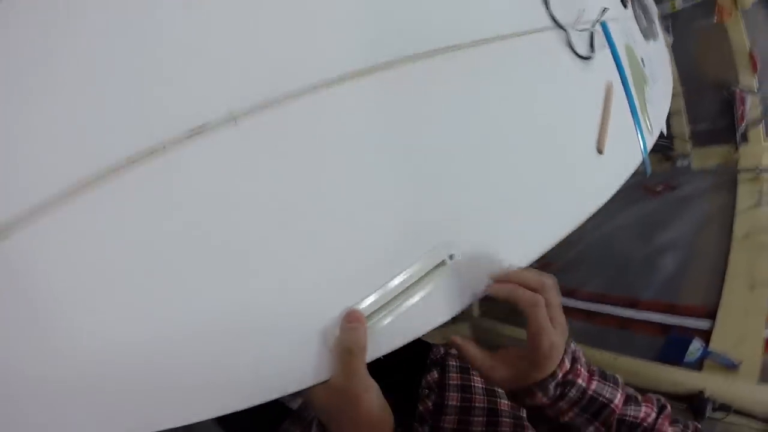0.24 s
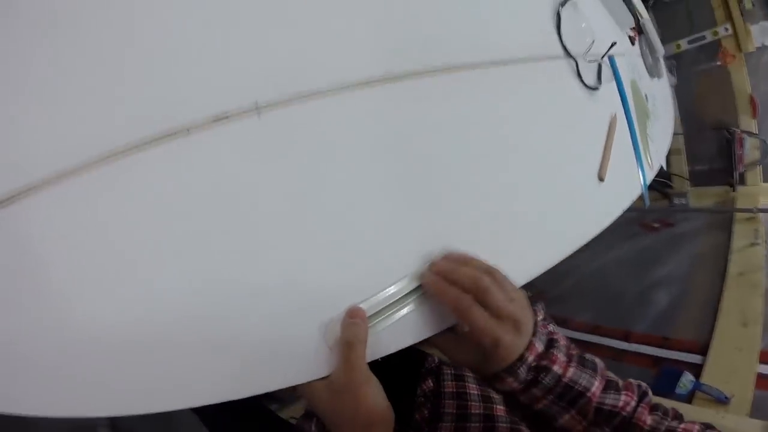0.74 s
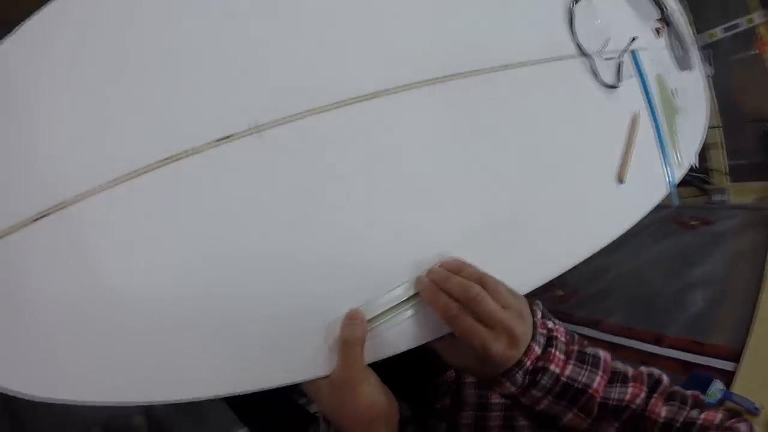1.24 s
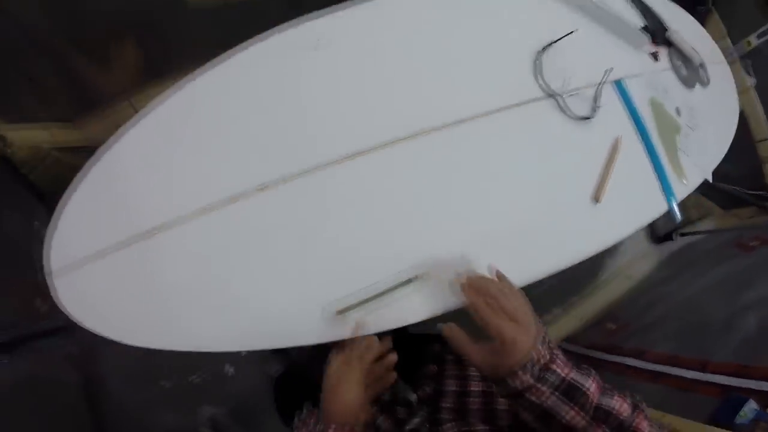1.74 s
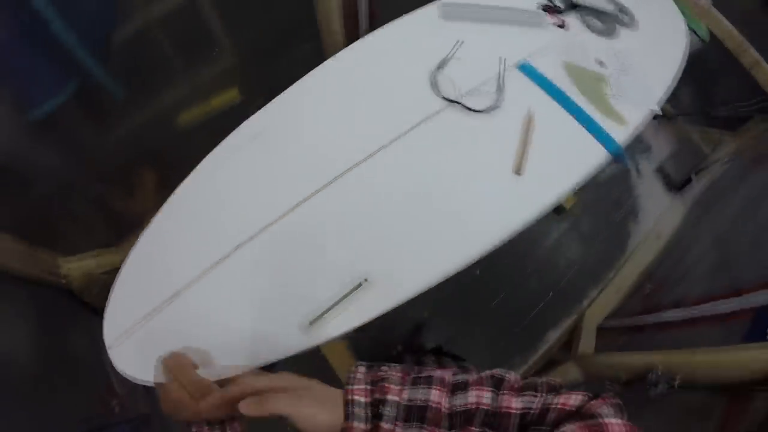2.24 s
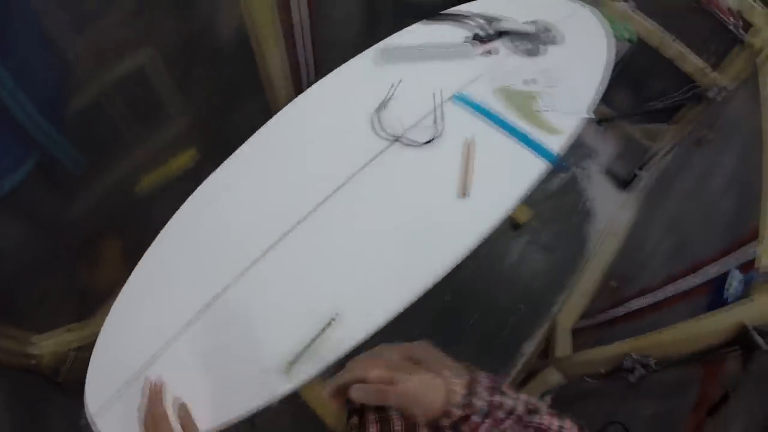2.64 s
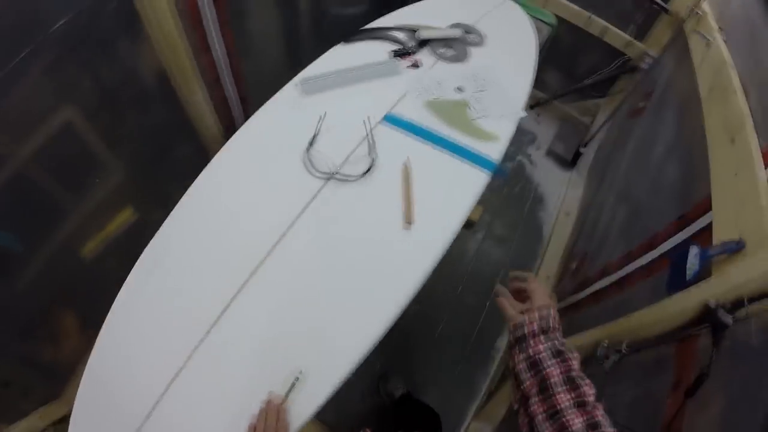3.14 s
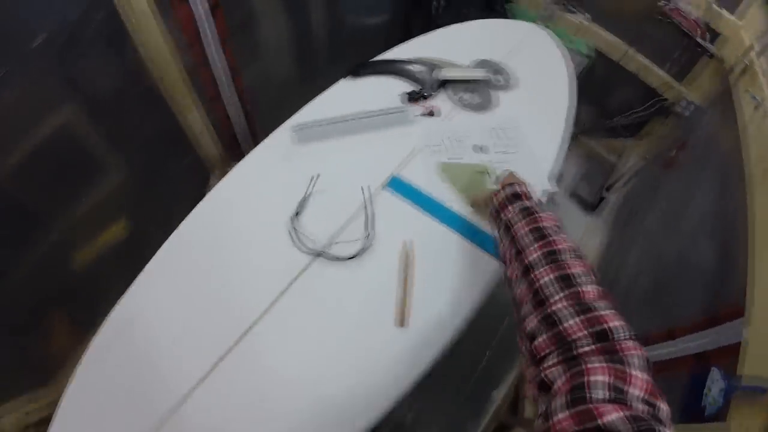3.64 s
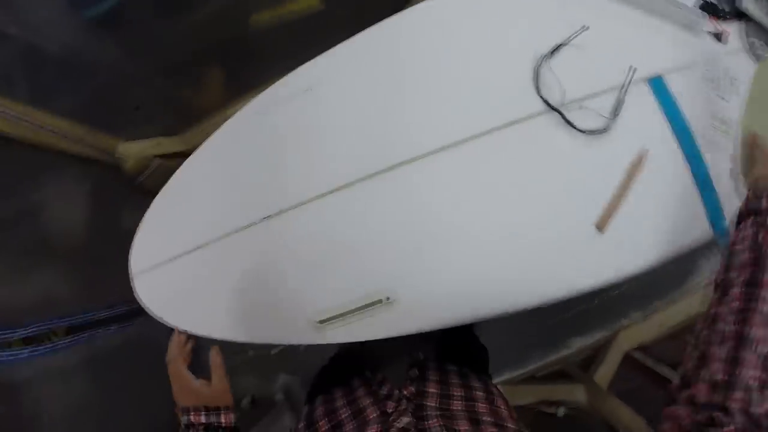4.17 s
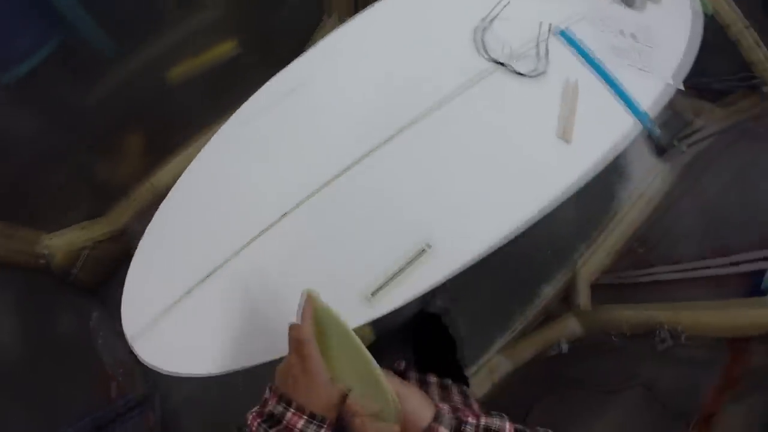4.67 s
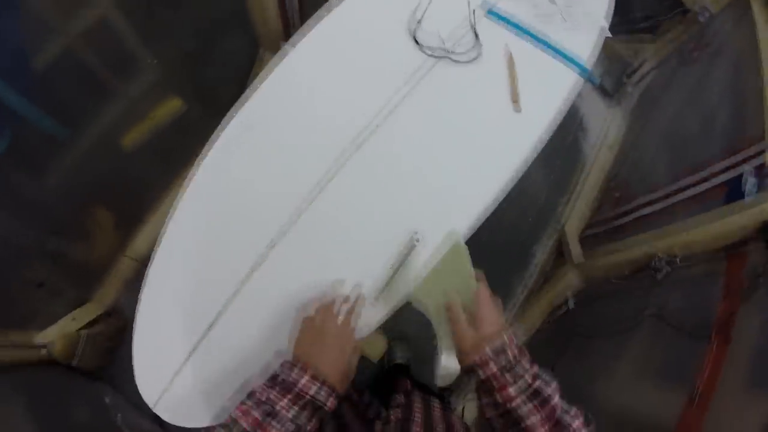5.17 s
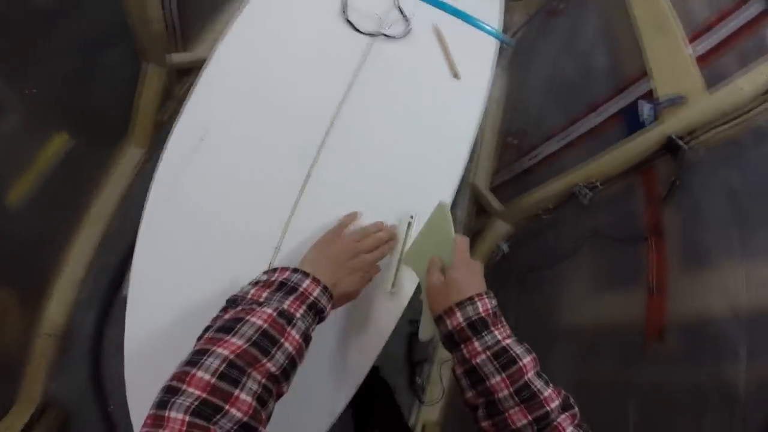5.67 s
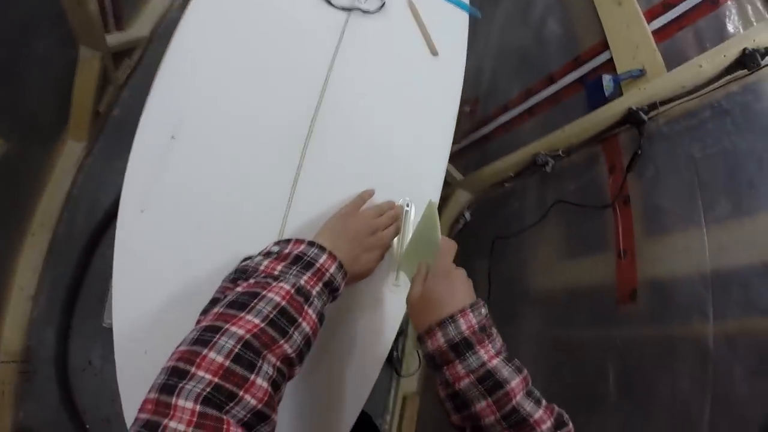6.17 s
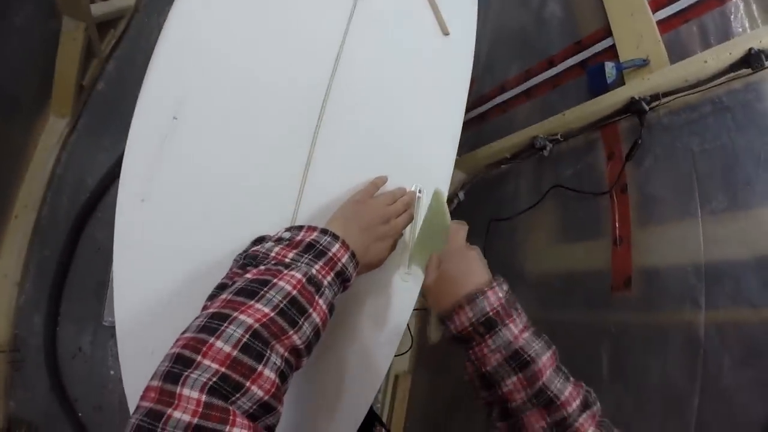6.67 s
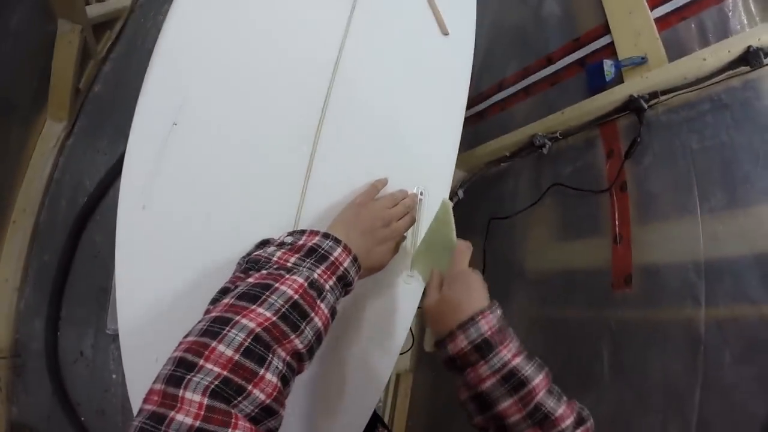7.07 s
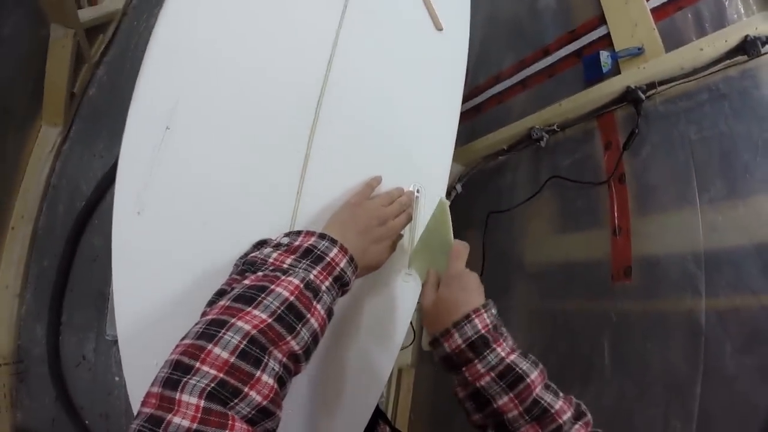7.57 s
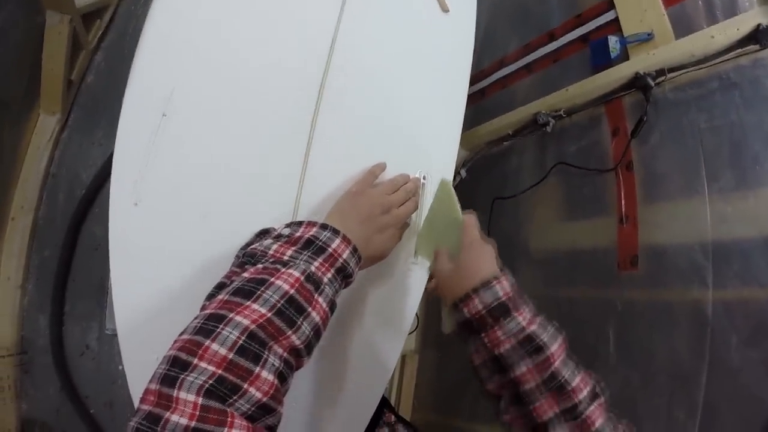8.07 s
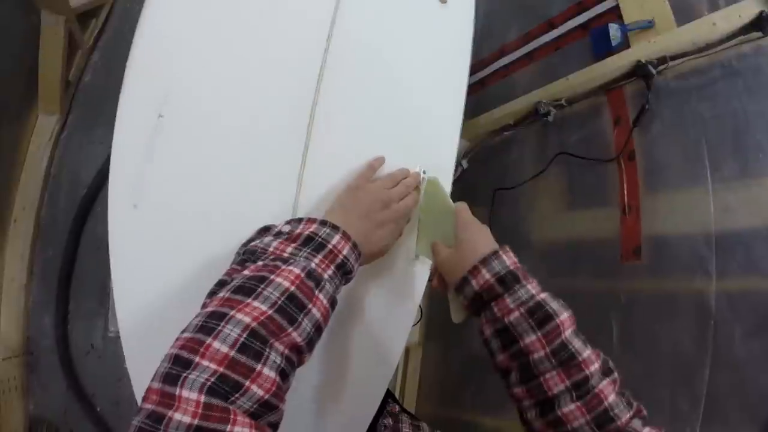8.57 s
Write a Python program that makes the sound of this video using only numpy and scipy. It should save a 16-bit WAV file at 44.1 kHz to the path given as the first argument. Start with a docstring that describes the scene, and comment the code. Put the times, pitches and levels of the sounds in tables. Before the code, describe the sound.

A small body-worn microphone near the hands catches dry tape-like ticks and rubbing on foam, airy palm swishes with brief gliding squeaky breaths of noise, and soft thuds of the board on its padded stand. After a sharp knock comes sparse, faint rubbing, then stronger stick-slip scraping and two loud plastic cracks. Quiet bassy room noise, short dull echoes.

```python
"""Fitting a fin to a foam blank

Hands work at a fin box set into a foam surfboard blank on a padded stand in a workshop. A tape is peeled, palms
and sleeves brush and hands rub together (dense grains), the blank is shifted with dull bumps, then a plastic fin
is knocked and pushed into the slot (stick-slip). Every tick, bump and knock is a pulse with briefly ringing modes
of the light blank and its stand; one tick may be a lip smack.
An air pocket adds gliding resonant noise; short echoes and a quiet noise hum make the room."""
import sys
import numpy as np
from scipy import signal
from scipy.fft import rfft, irfft, next_fast_len
from scipy.io import wavfile

SR = 44100
rng = np.random.default_rng(int(sys.argv[2]) if len(sys.argv) > 2 else 0)


def wrap_up_sound(samples):
    """Save the sound to the file named by the first command line argument, as 16-bit audio."""
    columns = np.atleast_2d(samples).T
    # keep every value between -1 and 1, then stretch to whole-number steps
    tamed = np.clip(columns, -1, 1)
    steps = np.round(tamed * 32767).astype(np.int16)
    wavfile.write(sys.argv[1], SR, steps)


def how_loud(loudness_db):
    """Turn decibels into a plain amplitude multiplier (0 dB gives 1, 20 dB gives 10)."""
    steps = np.asarray(loudness_db, float) / 20
    return 10 ** steps


N = 388521


def rms_one(x):
    """Scales to rms 1."""
    return x / np.sqrt(np.mean(x ** 2) + 1e-20)


def drift(rate_hz):
    """Slow random wander of rms about 1: noise through two equal low-pass poles."""
    hop = 40
    r = np.exp(-2 * np.pi * rate_hz * hop / SR)
    noise = rng.standard_normal(N // hop + 2002)
    slow = signal.lfilter([1], [1, -2 * r, r * r], noise)[2000:]   # drop the filter's start-up
    return np.interp(np.arange(N) / hop, np.arange(len(slow)), rms_one(slow))


def ring(drive, hz, t60_s):
    """One damped mode: a unit click sets a sine ringing from height 1."""
    r = how_loud(-60 / (t60_s * SR))
    w = 2 * np.pi * hz / SR
    return signal.lfilter([0, np.sin(w)], [1, -2 * r * np.cos(w), r * r], drive + 1e-18)


def coloured(x, spectrum):
    """Shapes white input to a spectrum (frequency [Hz], density [dB per Hz]); unit gain on white noise."""
    hz, db = np.transpose(spectrum)
    size = next_fast_len(len(x))
    bin_hz = np.arange(size // 2 + 1) * SR / size
    gain = rms_one(how_loud(np.interp(np.log(bin_hz + 1), np.log(hz), db)))
    return irfft(rfft(x, size) * gain, size)[:len(x)]


def grains(per_s, spread_db):
    """Random slips of uneven size; rms about 1 at a steady rate."""
    sizes = how_loud(spread_db * np.minimum(rng.exponential(1, N), 4)) * rng.choice([-1, 1], N)
    born = rng.random(N) < per_s / SR
    return sizes * born / np.sqrt(np.mean(sizes ** 2) * per_s / SR)


def touch(push_ms):
    """Pressure of one contact: a raised-cosine push and a longer, weaker rebound."""
    count = max(int(push_ms * SR / 1000), 4)
    rebound = -.55 * np.hanning(int(1.35 * count) + 2)
    return np.concatenate([np.hanning(count + 2), rebound])


def add(out, s, x):
    """Mixes x into out at s seconds."""
    at = int(s * SR)
    out[at:at + len(x)] += x[:N - at]


def in_time(spans):
    """Joins curve rows by straight lines, one value a sample."""
    s, *columns = np.transpose(np.concatenate(spans))
    return [np.interp(np.arange(N) / SR, s, c) for c in columns]


def strokes(peak_s, rise_s, fall_s, level_db, rest_db):
    """Strokes swell to a peak and die away; their powers add over a resting level; dB per sample."""
    fade_db = 20   # change over one rise or one fall
    t = np.arange(0, N + 64, 64)[:, None] / SR
    before = (peak_s - t) / np.maximum(rise_s, .004)
    after = (t - peak_s) / np.maximum(fall_s, .004)
    shape_db = level_db - fade_db * np.maximum(before, after)
    total_db = 10 * np.log10(np.sum(how_loud(2 * shape_db), axis=1) + how_loud(2 * rest_db))
    return np.interp(np.arange(N) / SR, t[:, 0], total_db)


# Room noise spectrum: (frequency [Hz], density [dB per Hz])
ROOM_TONE_SPECTRUM = [(12, -24), (20, 13.5), (81, -1), (643, -17.5), (2470, -27), (4700, -30), (11100, -38),
                      (12400, -50), (16100, -89), (22000, -120)]
ROOM_DB = -53.5


def room_tone():
    """Room hum: bass-heavy noise whose level wanders slowly."""
    level_db = ROOM_DB + 1.0 * drift(0.75)
    return how_loud(level_db) * coloured(rng.standard_normal(N), ROOM_TONE_SPECTRUM)


# Nominal modes of the padded stand: (frequency [Hz], level [dB], t60 [s])
STAND_MODES = [(66.1, -9, 0.44), (83.2, -6, 0.16), (118.2, -1.5, 0.13), (231, -22, 0.11)]
# Weight on the stand: (time [s], level [dB])
LEAN_CURVE = [(0.0, -54.5), (1.13, -67), (1.3, -67), (1.96, -60), (2.53, -56.5), (2.89, -62), (3.12, -57),
              (4.24, -55.5), (4.49, -79), (4.61, -49.5), (4.81, -60), (5.4, -57), (5.72, -36.5),
              (5.86, -73), (5.96, -34.5), (6.13, -53.5), (7.0, -60), (7.75, -59), (8.34, -64), (8.46, -50),
              (8.71, -48), (8.81, -36)]


def lean(level_db):
    """Weight shifts: unsteady noise keeps the low modes of the stand murmuring."""
    shake = rng.standard_normal(N) * how_loud(3.6 * drift(8.1))
    # half the level spread in dB, quicker decay
    murmur = sum(how_loud(m * .5) * ring(shake, hz, t60_s * 0.34) for hz, m, t60_s in STAND_MODES)
    return how_loud(level_db) * rms_one(murmur)


# Nominal modes of the foam blank: (frequency [Hz], level [dB], t60 [s])
BLANK_MODES = [(177, -11.5, 0.053), (205, -13.5, 0.086), (279, -7.5, 0.048), (351, -6.5, 0.031),
               (423, -9.5, 0.037), (440, -5, 0.022), (546, -12, 0.07), (599, -17.5, 0.073), (701, -8, 0.04),
               (758, -22.5, 0.051), (833, -6.5, 0.025), (896, 4.5, 0.013), (1063, -12, 0.074),
               (1273, -8.5, 0.028), (1416, -2, 0.015), (1442, -7, 0.036), (1690, -11.5, 0.045),
               (1900, -19, 0.035), (2100, -16, 0.037), (2260, -12, 0.12), (2460, -5, .04), (2750, -36, .03),
               (3380, 1, .03)]
# Fine grit on foam: (frequency [Hz], density [dB per Hz])
SCRAPE_SPECTRUM = [(240, -48.5), (400, -15), (631, 0), (682, -2), (1060, 0), (1790, -2), (3220, -6.5),
                   (9000, -25.5), (11700, -59), (19800, -120)]
# Fingers, tape and fin dragged on foam, one row a stroke:
# (peak time [s], rise [s], fall [s], scrape level [dB], shake of the blank re scrape [dB])
DRAG_STROKES = [(0.09, 0.87, 0.77, -54, -10), (0.338, 0.1, 0.029, -43.5, -2.5), (0.55, .4, 0.13, -59, -0.5),
                (0.84, 0.11, 0.44, -60, -12), (1.02, 0.66, 0.059, -46.5, -8.5),
                (1.12, 0.046, .22, -45.5, -9), (1.255, 0.32, 0.053, -40, -3.5),
                (1.334, 0.13, 0.083, -42.5, -7), (1.53, 0.046, 0.27, -46.5, -3),
                (1.628, 0.15, 0.13, -39.5, -8.5), (1.732, 0.15, 0.058, -33, -9.5),
                (2.0, 0.36, 0.45, -61.5, -2.5), (2.344, .2, .2, -63, -13), (2.65, 0.46, .15, -61, -3),
                (2.95, 0.4, 0.61, -55.5, -5.5), (3.052, 0.056, 0.071, -48, -3),
                (3.138, 0.059, 0.071, -46, -5.5), (3.29, 0.18, .12, -49.5, -20),
                (3.57, 0.68, 0.15, -49, -12), (3.876, 0.077, 0.32, -52.5, -1.5),
                (4.118, .06, .1, -49.5, -3.5), (4.39, .08, 0.13, -89, -14), (4.58, .15, 0.59, -55.5, -0.5),
                (4.83, 1, 0.43, -53, -12.5), (5.2, 0.38, 1, -56.5, -3.5), (5.63, 0.17, 0.59, -55.5, 0),
                (5.83, 0.059, 0.099, -47.5, 1), (5.924, 0.1, 0.072, -40, 2.5),
                (6.04, 0.33, 0.35, -47.5, 0.5), (6.372, 0.37, 0.051, -51.5, 0),
                (6.588, 0.14, 0.08, -49, -4), (6.71, 0.22, 0.9, -59, -1), (7.14, 0.2, 0.19, -58.5, -8),
                (7.228, 0.011, .03, -48, -8), (7.268, 0.0092, 0.056, -47.5, -2),
                (7.45, 0.03, 0.047, -42.5, -1), (7.52, 0.3, 0.55, -59.5, -1.5),
                (7.715, .03, 0.11, -54.5, 3.5), (7.877, .02, 0.24, -50.5, 0.5),
                (7.993, .06, 0.13, -48.5, 4), (8.11, 0.19, 0.3, -45.5, -6),
                (8.371, 0.078, 0.089, -33.5, 7.5), (8.46, 0.13, 0.23, -42.5, -3),
                (8.576, .2, 0.1, -44.5, 2), (8.652, .03, 0.12, -47, -8), (8.74, 0.07, 0.25, -43, 7),
                (8.81, 0.17, .1, -49, 7)]
DRAG_REST_DB = -66   # the hands never rest quite


def scrape():
    """Stick and slip: clumped slips over fine grit; each stroke also shakes the blank's low modes by its own amount."""
    *when, drag_db, deep_db = np.transpose(DRAG_STROKES)
    level_db = strokes(*when, drag_db, DRAG_REST_DB)
    shake_db = strokes(*when, drag_db + deep_db, DRAG_REST_DB) - level_db
    slips = np.convolve(grains(110 * how_loud(5.0 * drift(15)), 2.75), touch(0.34))[:N]
    # shorter t60 than after a knock
    high = sum(how_loud(m) * ring(slips, hz, t60_s * 0.73) for hz, m, t60_s in BLANK_MODES if hz > 750)
    slips = rms_one(slips + how_loud(7) * high)
    grit = grains(8000, 2.2)
    body = sum(how_loud(m) * ring(grit, hz, t60_s * .5) for hz, m, t60_s in BLANK_MODES if 190 < hz < 750)
    rubbing = 0.4 * slips + 0.73 * coloured(grit, SCRAPE_SPECTRUM)
    return how_loud(level_db) * (rubbing + how_loud(shake_db) * rms_one(body))


# Skin and cloth rubbing: sleeves and palms on foam, and hands rubbed together:
# (frequency [Hz], density [dB per Hz])
BRUSH_SPECTRUM = [(1470, -17), (2500, -16), (2860, -1), (5120, 3), (7860, -1.5), (11400, -6), (12400, -20),
                  (16100, -30), (22000, -120)]
# Palms, sleeves and rubbed hands, one row a stroke: (peak time [s], rise [s], fall [s], level [dB])
SWISH_STROKES = [(0.01, 0.062, 0.37, -58.5), (0.32, 0.11, 0.12, -53.5), (0.56, 0.38, .15, -66),
                 (0.78, .1, .5, -61), (0.932, 0.055, 0.22, -51.5), (1.078, 0.016, .2, -55),
                 (1.196, .03, 0.049, -49), (1.243, 0.025, .08, -47), (1.375, .4, .045, -57),
                 (1.525, .035, 0.21, -55.5), (1.63, 0.17, .3, -53.5), (1.72, 0.16, 0.068, -51.5),
                 (2.104, .03, 0.09, -68), (2.168, 0.0091, 0.024, -61), (2.27, 0.098, 0.17, -45),
                 (2.335, 0.13, .06, -43.5), (2.612, 0.065, 0.066, -39), (2.665, .08, 0.037, -58),
                 (3.047, 0.062, 0.095, -61), (3.154, 0.13, 0.2, -54.5), (3.28, .15, 0.055, -59),
                 (3.592, 0.38, 0.072, -50), (3.896, 0.15, 0.098, -56), (3.97, .03, 0.059, -57),
                 (4.11, 0.037, 0.12, -55), (4.155, 0.081, 0.044, -50), (4.385, 0.036, .2, -56),
                 (4.46, 0.24, 0.079, -56), (4.72, 0.1, 0.49, -58.5), (4.88, 0.55, .17, -64.5),
                 (5.04, 0.038, 0.54, -61), (5.55, 0.034, .5, -76), (5.672, .05, .1, -63),
                 (5.81, 0.075, .6, -58), (5.97, 0.55, .15, -60.5), (6.208, 0.28, 0.13, -58),
                 (6.585, .06, .12, -70), (7.23, .02, .07, -68), (7.27, .04, 0.099, -66),
                 (7.44, .01, 0.15, -58), (7.475, 0.09, .04, -61), (7.55, .1, 0.28, -76),
                 (7.996, 0.19, 0.19, -60.5), (8.156, 0.13, .07, -59), (8.28, .01, .03, -64),
                 (8.368, 0.083, 0.18, -62), (8.43, .03, 0.076, -56), (8.695, 0.066, 0.038, -53),
                 (8.81, 0.43, 0.12, -60)]
SWISH_REST_DB = -83


def brush():
    """Palms, sleeves and hands rubbed together: very dense fine grains, bright and flickering."""
    level_db = strokes(*np.transpose(SWISH_STROKES), SWISH_REST_DB)
    return how_loud(level_db + 1.72 * drift(20)) * coloured(grains(12000, 1.5), BRUSH_SPECTRUM)


# Hands and hips bump the blank on its stand: (time [s], pulse peak [dB], push time [ms],
# ring of the blank re pulse [dB], bump of the stand re pulse [dB])
BUMP_HITS = [(0.2701, -41, 0.92, -4, -8), (0.7675, -39.5, 1.2, -13, 2.5), (1.2735, -43, 0.76, -17, -2),
             (3.7886, -34, 2.1, -6, -24), (3.8619, -42, 0.61, -9, -3), (4.4913, -36, 1.33, -3.5, -1),
             (5.034, -30, 0.92, -6.5, -6), (5.085, -31, 0.62, -12.5, -4), (5.5233, -44, 1.9, 0.5, -1),
             (5.5419, -26, 0.71, -11, 0), (8.0519, -36.5, 0.94, -1.5, -10), (8.3234, -20, 2.5, -21, -18)]
BUMP_CRACK_DB = -24.5
# Short hard ticks of tape, nail and fin edge, and a click that may be a lip smack: (time [s],
# pulse peak [dB], push time [ms], ring of the blank re pulse [dB], plastic crack re pulse [dB])
TICK_HITS = [(0.9249, -23, 0.54, -16.5, -19.5), (0.952, -39, 0.31, -24, -22),
             (0.997, -32.5, 0.65, -15, -28), (1.0262, -29, 0.51, -38, -20.5),
             (1.074, -26.5, 0.45, -21, -27), (1.0998, -28, 0.36, -14.5, -21),
             (1.187, -31.5, 0.27, -14, -17.5), (1.212, -37, 0.4, -22, -27), (1.2347, -42, 0.46, -8, -21),
             (1.569, -34.5, 0.52, -12, -26), (1.6038, -26.5, 0.5, -30, -18),
             (1.644, -21.5, 0.46, -19, -21.5), (1.6804, -29, 0.41, -19, -15), (1.697, -30, 0.28, -5, -11),
             (1.73, -23, 0.45, -22, -14), (2.1658, -40.5, 0.33, -14.5, -16), (2.194, -30.5, 0.3, -33, -26),
             (2.4164, -41, 0.58, -17.5, -28), (2.7707, -33, 0.28, -22, -32),
             (3.258, -43.5, 0.32, -2.5, -27), (3.5434, -42, 0.43, -26, -5.5),
             (5.887, -34.5, 0.83, -4.5, -18), (6.5693, -43, 0.58, -9, -13), (6.6978, -44.5, 0.77, -4, -25),
             (7.136, -45.5, 0.6, -2.5, -19), (7.2267, -46, 0.14, -22, -13), (7.2647, -36.5, 0.38, -21, -17),
             (7.4356, -27, 0.3, -14.5, -23), (7.717, -47.5, 0.47, -5, -24), (8.136, -23, 0.49, -33, -12.5),
             (8.645, -33, 0.52, -32, -12)]
TICK_BUMP_DB = -42
# Fin knocked into its slot: (time [s], pulse peak [dB], push time [ms],
# ring of the blank re pulse [dB], plastic crack re pulse [dB])
KNOCK_HITS = [(5.7636, -8.5, 0.97, -12, -32.5), (5.9547, -20.5, 0.84, 0, -14), (5.995, -26.5, 1.1, -7, -18),
              (8.4237, -2.5, 0.62, -16.5, -28), (8.6812, -5.5, 0.81, -15, -25),
              (8.7608, -25.5, 0.8, -8, -28)]
KNOCK_BUMP_DB = -27.5


def contact_rows():
    """All contacts as (time [s], peak [dB], push [ms], ring [dB], bump [dB], crack [dB])."""
    ticks = [(*row, TICK_BUMP_DB, crack_db) for *row, crack_db in TICK_HITS]
    knocks = [(*row, KNOCK_BUMP_DB, crack_db) for *row, crack_db in KNOCK_HITS]
    return ticks + knocks + [(*row, BUMP_CRACK_DB) for row in BUMP_HITS]


# Plastic rattle, dull part: (frequency [Hz], density [dB per Hz])
CRACK_SPECTRUM = [(710, -10.5), (1200, 4.5), (1390, 1), (2450, -4), (3620, -13), (11300, -39), (12400, -68),
                  (16100, -84), (22000, -120)]
# Plastic rattle, bright part: (frequency [Hz], density [dB per Hz])
SNAP_SPECTRUM = [(1470, -38), (2500, -2), (3920, 4), (6260, -9), (7010, -16), (11300, -31.5), (12400, -41),
                 (16100, -64), (22000, -120)]
EAR_M = .6
CHATTER_S, FULL_CHATTER_MS = 0.039, 0.72   # contacts shorter than FULL_CHATTER_MS settle sooner


def contacts():
    """Each contact: direct pulse, modes of the blank, low modes of the stand, a short burst of rattling plastic."""
    out, tail_s = np.zeros(N), np.arange(int(.4 * SR)) / SR
    size = len(tail_s)
    rows = contact_rows()
    luck = rng.normal(0, 1, (len(rows), len(BLANK_MODES) + len(STAND_MODES)))
    jolts = rng.standard_normal((len(rows), size))
    dull = coloured(rng.standard_normal(N + size), CRACK_SPECTRUM)
    bright = coloured(rng.standard_normal(N + size), SNAP_SPECTRUM)
    early = tail_s < .025
    shove = (tail_s < .004) * np.sin(np.pi * tail_s / .004)   # the padded stand feels a slow push
    for (s, peak_db, ms, ring_db, bump_db, crack_db), own, jolt in zip(rows, luck, jolts):
        pulse, tick = touch(ms), np.zeros(size)
        add(tick, 0, pulse)
        settling = np.exp(-(tail_s / (CHATTER_S * min(ms / FULL_CHATTER_MS, 1))) ** 4)
        # the loose parts keep jolting the blank for a moment after the first touch
        strike = tick + how_loud(-31.5) * np.convolve(jolt * settling, pulse)[:size]
        # chance sets each mode's sign and shifts its level
        blank = sum(np.sign(c) * how_loud(m + 1.4 * c) * ring(strike, hz, t60_s)
                    for (hz, m, t60_s), c in zip(BLANK_MODES, own))
        # bending waves need a few milliseconds to spread through the foam
        blank = blank * (1 - np.exp(-tail_s / .0025)) / np.std(blank[early])
        stand = sum(how_loud(m + 0.53 * c) * ring(shove, hz, t60_s)
                    for (hz, m, t60_s), c in zip(STAND_MODES, own[::-1]))
        stand = stand / np.std(stand[early])
        at = int(s * SR)
        hard = np.clip(1.3 - ms / 0.5, 0, 1)   # a short, hard contact rattles brighter
        hiss = dull[at:at + size] + hard * bright[at:at + size]
        burst = how_loud(-60 * tail_s / 0.024) + how_loud(-1) * settling
        crack = hiss * burst * np.minimum(tail_s / 0.00052, 1)
        whole = tick + how_loud(ring_db) * blank + how_loud(bump_db) * stand + how_loud(crack_db) * crack
        add(out, s + EAR_M / 343, how_loud(peak_db) * whole)   # delay of the air path
    return out


# Air pocket between the rubbing faces: spans of (time [s], resonance [Hz], level [dB])
POCKET_SPANS = [
    [(2.16, 1350, -110), (2.2, 1350, -74), (2.25, 1500, -68), (2.285, 1650, -54.5), (2.31, 2100, -51),
     (2.34, 2460, -53), (2.39, 2900, -77), (2.47, 2500, -110), (2.55, 2100, -68), (2.58, 2250, -60),
     (2.61, 2450, -61), (2.66, 2760, -83), (2.72, 2633, -110), (4.28, 3420, -110), (4.33, 3380, -76.5),
     (4.36, 3270, -65), (4.4, 2750, -56), (4.425, 2350, -68), (4.455, 2560, -54.5), (4.5, 2790, -63),
     (4.55, 2800, -110)],
]


def pocket(hz, level_db):
    """Noise through a gliding resonance: slow noise riding on a sine and its quadrature."""
    low_pass = signal.butter(1, 220, fs=SR, output="sos")
    slow = signal.sosfilt(low_pass, rng.standard_normal((2, N)))
    phase = 2 * np.pi * np.cumsum(hz) / SR
    return how_loud(level_db) * rms_one(slow[0] * np.cos(phase) + slow[1] * np.sin(phase))


SHOP_T60_S, WALL_CUT_HZ, SHOP_DB = 0.24, 5600, -17


def workshop(x):
    """Room echoes: ten feedback delays, duller on every round, evaluated in frequency."""
    size = next_fast_len(N + SR)
    w = 2 * np.pi * np.arange(size // 2 + 1) / size
    dull = 1 / (1 + 1j * w * SR / (2 * np.pi * WALL_CUT_HZ))
    lags = np.linspace(.007, .037, 10) * SR * rng.uniform(0.85, 1.08, 10)   # samples
    echoes = 0
    for k, lag in enumerate(lags):
        loop = how_loud(-60 * lag / SR / SHOP_T60_S) * dull * np.exp(-1j * w * lag)
        echoes = echoes + (-1) ** k * loop / (1 - loop)
    return irfft(rfft(x, size) * echoes, size)[:N]


def scene():
    """Hands and fin close by, their echoes, the stand and the room tone."""
    near = contacts() + scrape() + brush() + pocket(*in_time(POCKET_SPANS))
    echoes = how_loud(SHOP_DB) * workshop(near)
    return (near + echoes + lean(*in_time([LEAN_CURVE])) + room_tone())[None]


def roll_off(x):
    """The treble ends steeply here."""
    return signal.sosfilt(signal.butter(12, 12540, fs=SR, output="sos"), x)


def record(dry):
    """A small microphone that drops the deepest bass."""
    bass_cut = signal.butter(3, 38, "high", fs=SR, output="sos")
    mix = signal.sosfilt(bass_cut, dry)
    return roll_off(mix)


dry = scene()
out = record(dry)
wrap_up_sound(out)
```